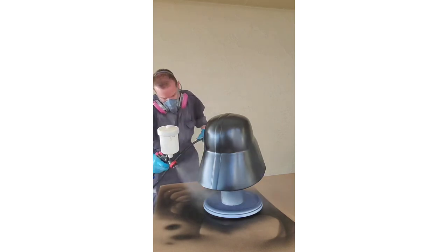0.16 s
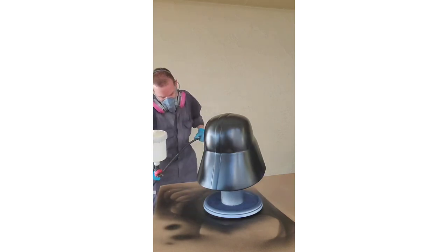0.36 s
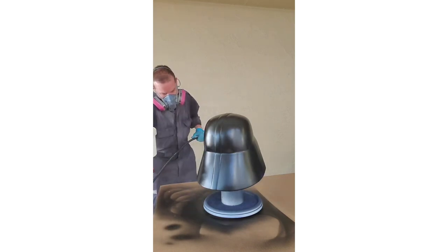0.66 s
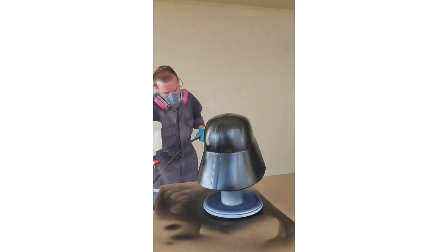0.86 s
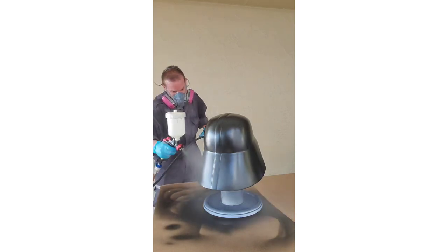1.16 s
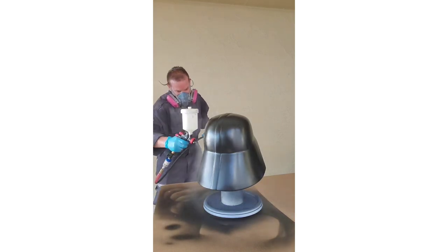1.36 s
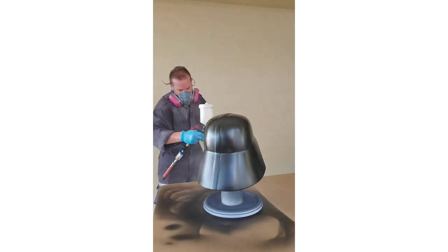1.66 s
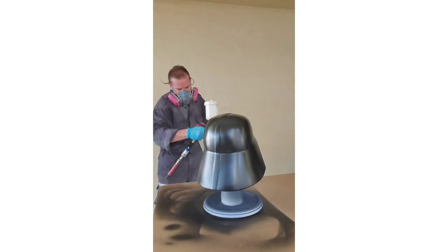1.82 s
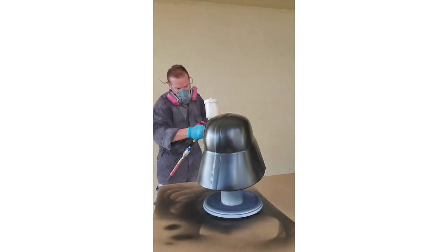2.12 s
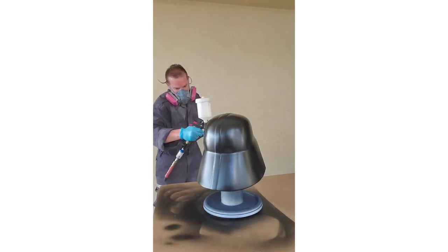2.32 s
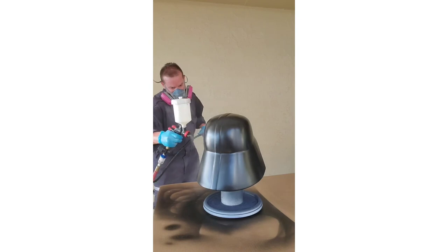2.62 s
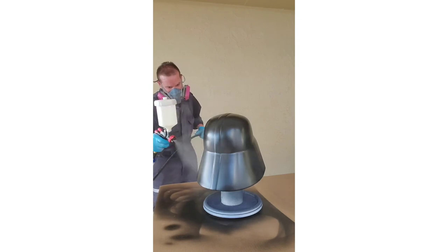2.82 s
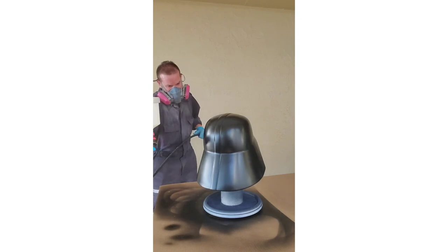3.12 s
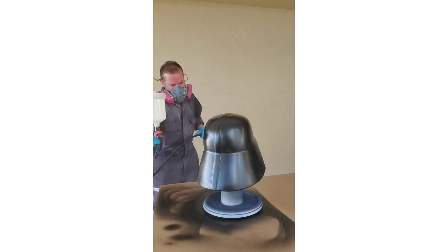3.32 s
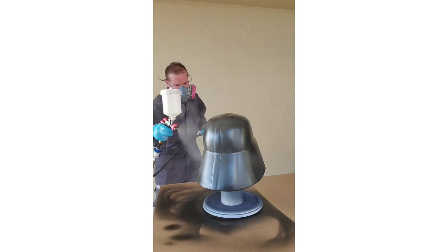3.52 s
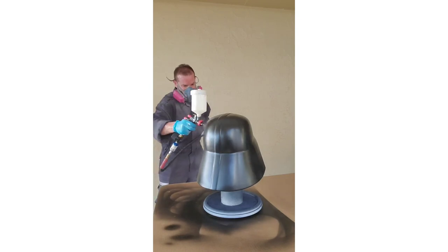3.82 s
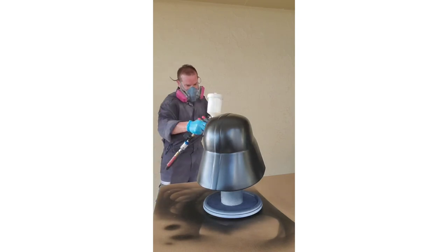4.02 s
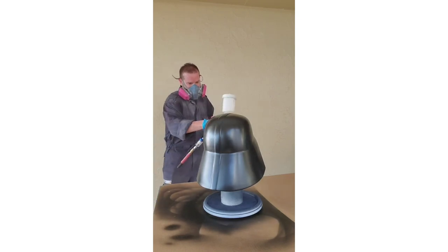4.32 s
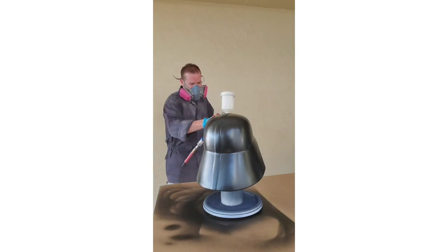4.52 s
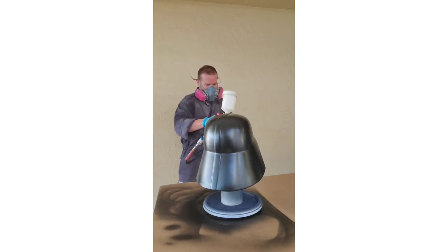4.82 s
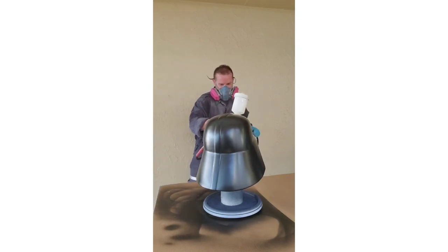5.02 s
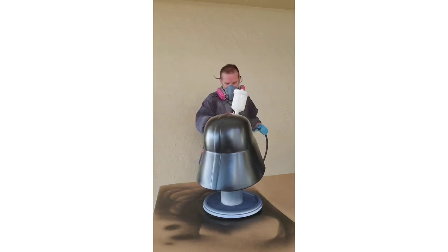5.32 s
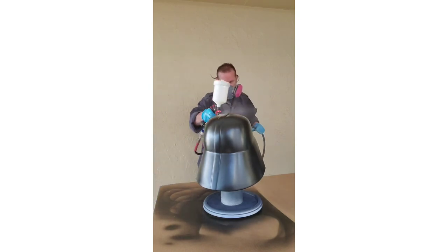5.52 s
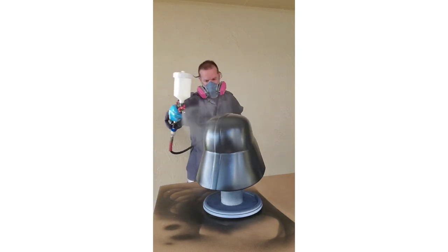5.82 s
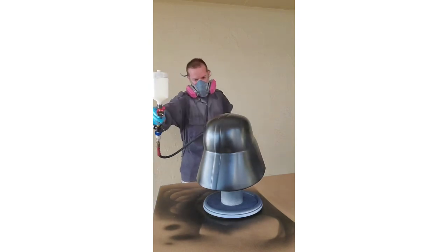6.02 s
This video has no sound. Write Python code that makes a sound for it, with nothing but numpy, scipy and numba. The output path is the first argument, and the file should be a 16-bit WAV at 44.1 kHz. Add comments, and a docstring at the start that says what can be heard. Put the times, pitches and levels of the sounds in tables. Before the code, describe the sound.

In a bare-walled workshop, a nearby phone captures a paint gun in stereo. A bright pressurised hiss is already running and stops at 0.2 s with a dull, rattling trigger clunk. Overalls and hose brush softly before the second pull, 0.7 to 1.6 s, which opens with a sharp spit. The third runs 2.0 to 2.9 s, softening and dulling around 2.3 as the gun swings away, then a hollow rush off the shell near 2.5. The fourth, 3.3 to 4.1 s, starts with the strongest spit. A longer gap holds faint brushes at 4.3 and 4.8 and a leak of air just before the last pull, 5.2 to 5.9 s, dipping around 5.45. Every pull ends in a clunk with short echo. A low puff at 1.5 and soft thud at 3.7 are subtle. Fan rush, faint wavering hum and thumping bass draught continue throughout.

```python
"""A bright hiss is already running: a compressed-air paint gun, making the first of five passes over a helmet.
Each later pull opens with a spit; the hiss, filtered noise, gets softer and duller when the gun swings away.
The jet glances off the helmet with a hollow rush, the trigger clunks back, and the workshop echoes.
Between pulls, overalls and hose brush past and air leaks from the gun; a low puff and one soft thud sound.
Behind it all an extraction fan rushes and hums, and its draught, bass noise in gusts, buffets a phone's two ports."""
import sys
import numpy as np
from scipy import signal
from scipy.fft import rfft, irfft
from scipy.io import wavfile
from scipy.ndimage import uniform_filter1d
from numba import njit

SR = 44100
rng = np.random.default_rng(int(sys.argv[2]) if len(sys.argv) > 2 else 0)


def master_out(mix):
    """Clip the mix to full scale and print it as 16-bit PCM to the path in sys.argv[1]."""
    frames = np.transpose(np.atleast_2d(mix))
    ceiling = np.clip(frames, -1, 1)
    pcm = np.round(ceiling * 32767).astype(np.int16)
    wavfile.write(sys.argv[1], SR, pcm)


N = 271656
T = np.arange(N) / SR  # time of every sample, in seconds

# Trigger pulls: start_s, stop_s, spit_db (blast of stored pressure), jet_db (level of the hiss)
TRIGGER_PULLS = [(-.3, 0.206, -50, -29.5), (0.692, 1.625, -13, -31), (2.037, 2.867, -25, -28),
                 (3.258, 4.06, -11, -32.5), (5.155, 5.899, -23, -28.5)]


def valve(close_s=0.021, leak_db=-10):
    """Air flow: the valve leaks as the trigger takes up, more under high pressure, opens fast, then fades shut."""
    open_s, leak_s = 0.026, 0.032
    flow = 0
    for start, stop, spit_db, _ in TRIGGER_PULLS:
        leak_growth = np.clip((T - start + leak_s) / leak_s * 1.26, 0, 1) ** 2  # full just before the start
        leak = undb(leak_db + spit_db / 2) * leak_growth
        opening = np.clip((T - start) / open_s + 0.5, 0, 1) ** 2
        closing = np.exp(-np.maximum(T - stop, 0) / close_s)
        flow = flow + np.maximum(leak, opening) * closing
    return flow


# Colour of the hiss at the two microphone ports; the left one rings near 8 and 15.5 kHz:
# pitch_hz, left_db, right_db (relative levels)
JET_COLOUR = [(600, -28.7, -28.3), (1000, -25.1, -25.9), (1500, -14.5, -14.5), (2400, -13.0, -13.2),
              (3600, -3.1, -6.3), (5800, -0.0, -1.9), (6800, 0.1, -1.5), (7800, 3.2, -1.2),
              (8600, -5.5, -5.2), (9500, -10.5, -5.0), (11200, -5.9, -2.2), (13000, 0.2, 1.1),
              (14500, 7.8, 0.5), (15500, 14.7, 0.0)]
# The gun swings away from the phone and back: middle_s, loss_db, half_length_s
GUN_SWINGS = [(0.91, 2, 0.085), (1.454, 2, 0.046), (2.286, 5.5, 0.23), (3.487, 1.5, 0.11), (3.92, 2, 0.15),
              (5.453, 4.5, 0.19)]
# Treble level over the body, left minus right, and extra treble loss for each dB that a swing takes
TREBLE_DB, TREBLE_PAN_DB, BEAMING = 11, 11.5, 0.61
# Air flows before the paint starts and after it stops, so each pull starts and ends brighter
BRIGHT_START_DB, BRIGHT_START_S, BRIGHT_END_DB, BRIGHT_END_S = 6, 0.12, 2, 0.057


def jet(flow, beam_wander_db=2.5):
    """Turbulent hiss from the air cap; its treble is beamed, so it fades most as the gun swings away."""
    level_db, dry_db = np.zeros((2, N))
    for start, stop, _, jet_db in TRIGGER_PULLS:
        level_db = np.where(T > start, jet_db, level_db)
        bright_start = (T > start) * np.exp(-np.abs(T - start) / BRIGHT_START_S)
        dry_db = dry_db + BRIGHT_START_DB * bright_start + BRIGHT_END_DB * bump(stop, BRIGHT_END_S)
    away_db = sum(loss_db * bump(s, half_s) for s, loss_db, half_s in GUN_SWINGS)
    treble_db = TREBLE_DB - BEAMING * away_db + dry_db

    # the plume is wide, so part of its noise differs from port to port
    air = glance(rng.standard_normal(N), share=0.99) + 1.08 * rng.standard_normal((2, N))
    colours = np.array(JET_COLOUR)
    air = np.array([colour(air[c], colours[:, [0, c + 1]]) for c in range(2)])
    _, air = split(air, 600)  # a narrow jet has no bass
    body, treble = split(air, 8600)
    treble = np.array([unit(side) for side in treble])
    beam = treble * undb(treble_db) * pan(TREBLE_PAN_DB + beam_wander_db * walk(9.7))

    # paint tearing into droplets makes the hiss flutter
    flutter = undb(0.33 * walk(35) + 0.37 * walk(300))
    return (unit(body) + beam) * undb(level_db - away_db) * flow * flutter


def glance(x, share, count=6, drift_s=0.0011):
    """Helmet, table and painter return echoes along slowly changing paths; each port hears its own."""
    ports = []
    for _ in range(2):
        lags_s = rng.uniform(0.005, 0.025, count)
        echoes = sum(np.interp((T - lag - drift_s * walk(1.5)) % T[-1], T, x) for lag in lags_s)
        ports.append(echoes * share)
    direct = np.array([x, np.roll(x, 2)])  # the gun is nearer the left port
    return np.array(ports) + direct


# Colour of the opening spit: pitch_hz, level_db (relative)
SPIT_COLOUR = [(1000, -46), (3000, -22), (6000, -5.5), (8000, -9), (8700, -6), (10500, -2), (12000, 5.5),
               (15700, 4)]


def spit(decay_s=0.034, pan_db=-5):
    """The pressure stored in the hose escapes first, in a short bright blast."""
    rise_s, hold_s = 0.009, 0.014  # the hold counts from the start of the pull
    blast, lag_s = 0, np.zeros(N)
    for start, _, spit_db, _ in TRIGGER_PULLS:
        age = np.maximum(T - start, 0)
        rise = np.minimum(age / rise_s, 1) ** 1.4
        blast = blast + undb(spit_db) * rise * np.exp(-np.maximum(age - hold_s, 0) / decay_s)
        lag_s = np.where(T > start, 0.000272 + 0.0004 * age, lag_s)
    air = stereo_noise(alike_hz=3000)
    # a grazing echo arrives later and later, so its colouring slides down the blast
    echo = np.array([np.interp(T - lag_s, T, side) for side in air])
    return unit(colour(air + 0.5 * echo, SPIT_COLOUR)) * blast * pan(pan_db)


# The jet blows across the hollow shell: middle_s, level_db (at full flow), half_length_s, pitch_hz
SHELL_RUSHES = [(.05, -66, .2, 1650), (1.14, -57, .22, 1620), (2.488, -48.5, 0.24, 1361),
                (5.8, -65, 0.13, 1520)]


def shell(flow, width_hz=270, wander=0.035):
    """A hollow rush where the jet strikes the helmet; its pitch shifts with the spot that is hit."""
    slow = signal.butter(2, width_hz / 2, fs=SR, output="sos")
    swirl = signal.sosfilt(slow, stereo_noise(alike_hz=90) + 1j * stereo_noise(alike_hz=90))
    turn = 2j * np.pi * np.cumsum(1 + wander * walk(7)) / SR
    rush = 0
    for s, db, half_s, hz in SHELL_RUSHES:
        narrow = unit(np.real(swirl * np.exp(hz * turn)))  # slow noise moved up around the resonance
        rush = rush + narrow * undb(db) * bump(s, half_s)
    return rush * flow * undb(2 * walk(24.2))


# The trigger snaps back: start_s, level_db
TRIGGER_CLUNKS = [(.219, -33), (1.634, -36), (2.879, -32.5), (4.069, -40), (5.906, -39)]
# Ringing tones of the gun and its paint cup: pitch_hz, level_db (relative), t60_s (time to fall 60 dB)
GUN_TONES = [(310, -1, 0.019), (420, -4, .04), (515, 1.5, 0.046), (574, 1.5, 0.094), (860, -14, 0.045),
             (1630, -20, 0.018)]


def trigger(rattle_db=-7, rattle_decay_s=0.044):
    """The needle seats with a dull knock; the loose lever rattles on briefly and rings the gun and cup."""
    hits, t = np.zeros(N), T[:SR // 4]
    ring = sum(undb(db - 60 * t / t60) * np.sin(2 * np.pi * hz * t) for hz, db, t60 in GUN_TONES)
    ring = ring / np.max(np.abs(ring))
    for s, db in TRIGGER_CLUNKS:
        hits[int(s * SR)] += undb(db)
        rattle_times_s = rng.uniform(0.00371, 0.05, size=6)
        for late, size in zip(rattle_times_s, rng.standard_normal(size=6)):
            hits[int((s + late) * SR)] += undb(db + rattle_db) * size * np.exp(-late / rattle_decay_s)
    return np.tile(signal.fftconvolve(hits, ring)[:N], (2, 1))


# Brushes of overalls and hose, and a leak of air from the gun just before the last pull:
# peak_s, level_db, rise_s, decay_s
BRUSHES_AND_LEAK = [(.52, -57, .03, .06), (.66, -53.5, 0.022, 0.037), (4.335, -51, 0.0088, 0.051),
                    (4.83, -55, .008, 0.06), (5.14, -48.5, 0.062, 0.038)]


def brushes_and_leak():
    """Short grainy swells of mid-pitched noise: overalls and hose brush, then air leaks before the last pull."""
    swell = 0
    for s, db, rise_s, decay_s in BRUSHES_AND_LEAK:
        swell = swell + undb(db) * np.exp(-np.maximum((s - T) / rise_s, (T - s) / decay_s))
    grains = undb(walk(290))
    return unit(band(stereo_noise(alike_hz=1500), 1600, 4200, order=1) * grains) * swell


# A low puff of draught on the ports, then one soft low thud:
# start_s, pitch_hz, level_db (before the rise and decay), decay_s
PUFF_AND_THUD = [(1.498, 121, -30, 0.028), (3.689, 166.5, -42.5, 0.049)]


def puff_and_thud(rise_s=0.0072):
    """A puff of draught and a soft thud, each a low tone that swells and dies within a few cycles."""
    out = 0
    for s, hz, db, decay_s in PUFF_AND_THUD:
        age = np.maximum(T - s, 0)
        swell = (1 - np.exp(-age / rise_s)) * np.exp(-age / decay_s)
        out = out + undb(db) * np.sin(2 * np.pi * hz * age) * swell
    return out


# Colour of the fan's rush: pitch_hz, level_db (relative, per Hz)
FAN_COLOUR = [(30, -26), (80, 13), (150, 1), (250, -2), (450, -3.5), (750, -5), (1050, -8.5), (1250, -7.5),
              (2000, -11), (4000, -12.5), (8000, -15), (8800, -21), (13500, -22), (15500, -19.5)]
FAN_DB, FAN_LINE_HZ, FAN_LINE_DB = -51, 715.4, -66  # the rush, then the blade tone


def fan(duct_db=-64):
    """Steady rush of the extractor; a wavering blade tone sits in a resonance of the duct."""
    rush = unit(colour(stereo_noise(alike_hz=960), FAN_COLOUR)) * undb(FAN_DB + 0.5 * walk(2.07))
    duct = unit(band(stereo_noise(alike_hz=1200), 668, 855)) * undb(duct_db)
    phase = 2 * np.pi * np.cumsum(FAN_LINE_HZ * (1 + 0.00294 * walk(12))) / SR
    waver = undb(2.5 * walk(22))
    blade_tone = unit(np.sin(phase) * waver) * undb(FAN_LINE_DB)
    return rush + duct + blade_tone


# The underlying draught, which drifts from the right port to the left after a lull:
# time_s, level_db, left_minus_right_db
DRAUGHT_COURSE = [(0, -41.5, -12), (.45, -40.5, -6), (.9, -42, -2), (1.9, -44.5, -3), (2.8, -37.5, -3),
                  (3.15, -45, -1), (3.32, -50, -7), (4.0, -46, 0), (4.6, -46, 4), (5.6, -38, 0),
                  (6.16, -48.5, -2)]
# Gusts that thump on the ports: middle_s, level_db, half_length_s, left_minus_right_db,
# fine_db (share of fine eddies)
DRAUGHT_GUSTS = [(0.115, -25.5, 0.016, -16, -17), (0.613, -25.5, 0.033, -7, -14.5),
                 (0.826, -37, 0.049, 8, -14), (1.055, -33.5, 0.016, -15, -14), (1.185, -32, 0.077, -4, -17),
                 (1.515, -27, 0.016, -4, -14), (1.663, -37.5, 0.025, 19, -25),
                 (1.917, -38, 0.089, -11, -21), (2.348, -32, 0.027, 7, -17), (2.432, -27.5, 0.042, -4, -17),
                 (2.616, -37.5, 0.033, -17, -28), (3.108, -34, 0.076, -4, -15),
                 (4.373, -37, 0.097, -8, -27), (4.67, -31, 0.098, 9.5, -9.5), (4.801, -30, 0.032, 9, -10.5),
                 (5.015, -36.5, 0.087, 12, -17), (5.294, -28, 0.014, 5, -9), (6.049, -35, 0.026, 22.5, -32)]
# Colour of the buffeting: pitch_hz, level_db (relative, per Hz)
BUFFET_COLOUR = [(15, -20), (30, 0), (50, 1.5), (66, 10), (90, 2.5), (130, -18.5), (200, -31.5), (400, -38),
                 (1000, -76)]


def draught(fine_db=-17, unrest_db=3.0):
    """Eddies thump on the ports as bass noise; some gusts break into finer, higher ones."""
    level_db, pan_db = curves(DRAUGHT_COURSE)
    unrest = unrest_db * np.array([walk(11), walk(13)])
    power = (undb(level_db + unrest) * pan(pan_db)) ** 2
    fine_power = power * undb(fine_db) ** 2
    for s, db, half_s, side_db, share_db in DRAUGHT_GUSTS:
        gust = undb(db) * bump(s, half_s) * pan(side_db)
        power = power + gust ** 2
        fine_power = fine_power + (gust * undb(share_db)) ** 2
    eddies = even(colour(stereo_noise(alike_hz=40.4), BUFFET_COLOUR))
    fine = even(band(stereo_noise(alike_hz=60), 81, 161.6))
    return eddies * np.sqrt(power) + fine * np.sqrt(fine_power)


def even(x):
    """Level out the noise's own swells, so that the gusts set the level."""
    return x / np.sqrt(uniform_filter1d(x ** 2, SR // 15, axis=1))


ROOM_T60_S, ROOM_TREBLE_T60_S, ROOM_DB = 0.55, 0.21, -12


def room(x, wet_db):
    """Bare walls: a diffuse tail of fading noise whose top treble dies sooner."""
    t = T[:SR]
    low, high = split(rng.standard_normal((2, SR)), 14000)
    tail = low * undb(-60 * t / ROOM_T60_S) + high * undb(-60 * t / ROOM_TREBLE_T60_S)
    tail = tail * (t > 0.006)  # the walls answer after 6 ms
    tail /= np.sqrt(np.sum(tail ** 2, axis=1, keepdims=True))
    echo = signal.fftconvolve(x, tail, axes=1)[:, :N]
    return (x + undb(wet_db) * echo) / np.sqrt(1 + undb(2 * wet_db))


def undb(db):
    """Decibels to gain."""
    return 10 ** (np.asarray(db) / 20)


def unit(x):
    """Scale to an rms (average strength) of 1."""
    return x / np.sqrt(np.mean(x ** 2))


def bump(s, half_s):
    """A smooth rise and fall around a moment, 0-1."""
    return np.exp(-((T - s) / half_s) ** 2)


def pan(db):
    """Left and right gains for a level difference, left minus right."""
    return undb(np.vstack([db, -db]) / 2)


def curves(rows):
    """Each column of a table as a line through time; the first column holds the times."""
    s, *columns = np.transpose(rows)
    return [np.interp(T, s, c) for c in columns]


def walk(rate):
    """Smooth random drift with a spread of about 1, moving to a new value `rate` times a second."""
    k = max(int(SR / rate), 1)
    steps = np.repeat(rng.standard_normal(N // k + 1), k)[:N]
    return unit(uniform_filter1d(uniform_filter1d(steps, k), k))


def stereo_noise(alike_hz):
    """Noise that is the same at both ports in the bass and unrelated in the treble."""
    mid, side = rng.standard_normal((2, N))
    f = np.fft.rfftfreq(N, 1 / SR)
    likeness = 1 / (1 + (f / alike_hz) ** 2)
    mid = irfft(rfft(mid) * np.sqrt(1 + likeness), N)
    side = irfft(rfft(side) * np.sqrt(1 - likeness), N)
    return unit(np.array([mid + side, mid - side]))


def colour(x, rows):
    """Filter by a spectrum of (Hz, dB) points."""
    hz, db = np.transpose(rows)
    f = np.maximum(np.fft.rfftfreq(N, 1 / SR), 1)
    gain_db = np.interp(np.log(f), np.log(hz), db)
    return irfft(rfft(x) * undb(gain_db), N)


def band(x, lo_hz, hi_hz, order=2):
    """Keep mainly the pitches between two limits."""
    sos = signal.butter(order, [lo_hz, hi_hz], "band", fs=SR, output="sos")
    return signal.sosfilt(sos, x)


def split(x, hz):
    """The parts below and above a frequency; they sum to the whole."""
    size = x.shape[-1]
    f = np.fft.rfftfreq(size, 1 / SR)
    low = irfft(rfft(x) / (1 + (f / hz) ** 8), size)
    return low, x - low


@njit
def follow(x, attack, release):
    """An envelope that rises fast and sinks slowly."""
    out, e = np.empty(len(x)), 0.
    for i in range(len(x)):
        e += (x[i] - e) * (attack if x[i] > e else release)
        out[i] = e
    return out


def scene():
    """Gun and painter in the room, over a puff, a thud, the fan and its draught."""
    flow = valve()
    gun = room(jet(flow) + spit() + shell(flow), wet_db=ROOM_DB)
    handling = room(trigger() + brushes_and_leak(), wet_db=-13.5)
    return gun + handling + puff_and_thud() + fan() + draught()


TOP_HZ = 15740


def record(dry, knee_db=-20, attack_s=0.005, release_s=0.81, squeeze=0.17):
    """The phone turns its gain down on loud sounds, recovers slowly and cuts the top treble."""
    loudness = np.sqrt(np.abs(uniform_filter1d(np.mean(dry ** 2, axis=0), SR // 200)))
    held = follow(loudness, 1 / (attack_s * SR), 1 / (release_s * SR))
    gain = np.maximum(held / undb(knee_db), 1) ** -squeeze
    top_cut = signal.ellip(16, 0.2, 60, TOP_HZ, fs=SR, output="sos")
    return signal.sosfilt(top_cut, dry * gain)


dry = scene()
out = record(dry)
master_out(out)
```